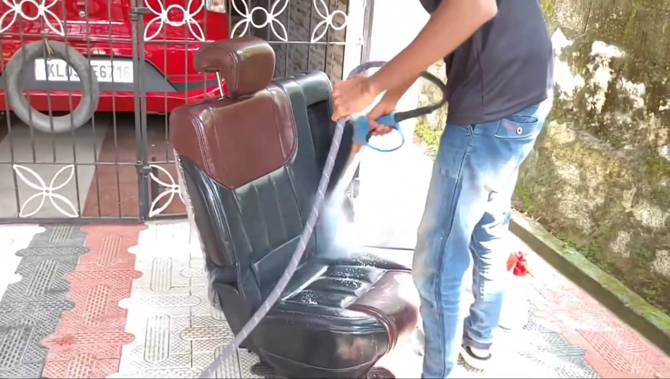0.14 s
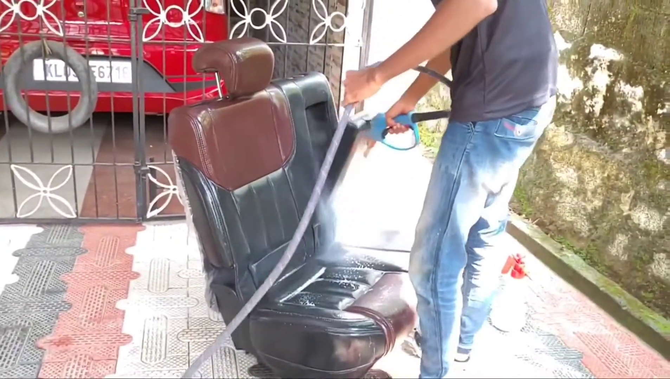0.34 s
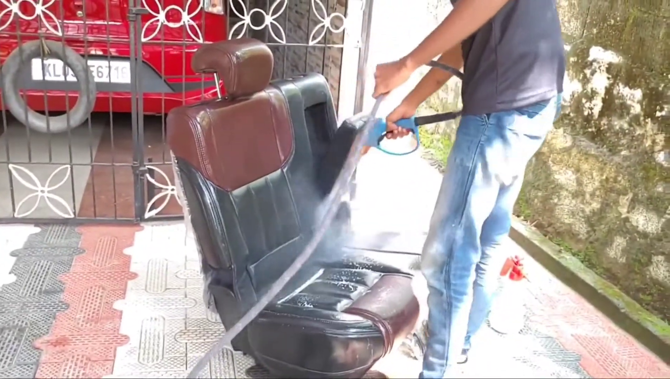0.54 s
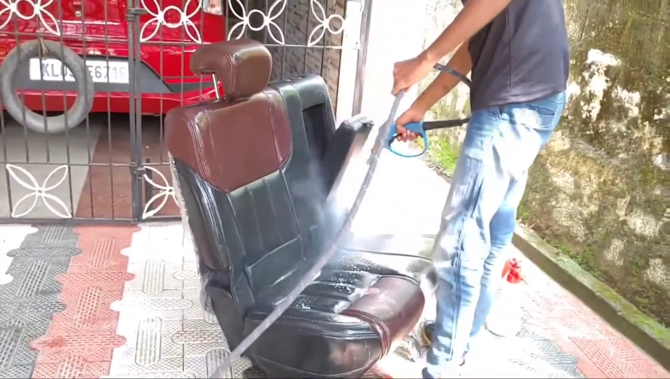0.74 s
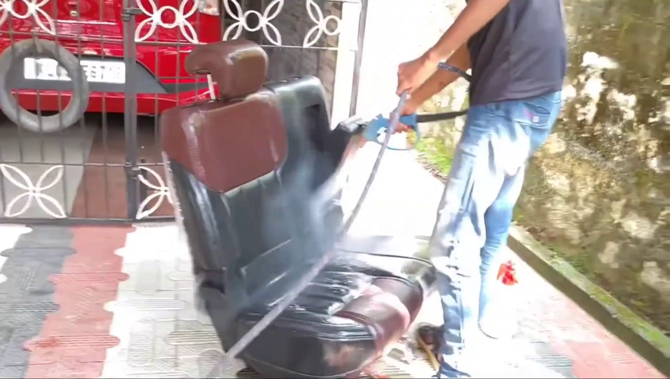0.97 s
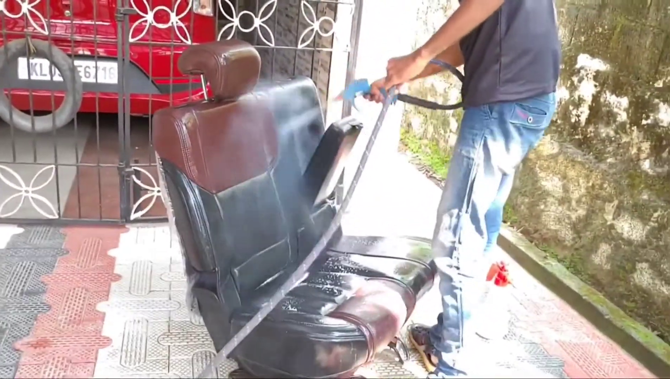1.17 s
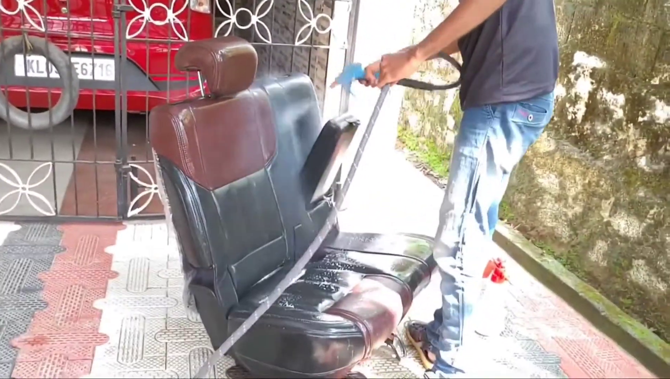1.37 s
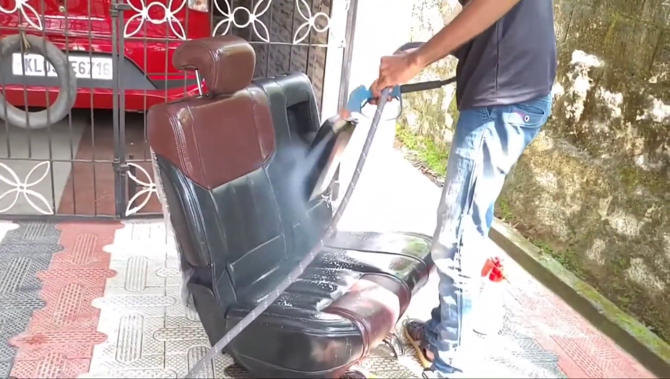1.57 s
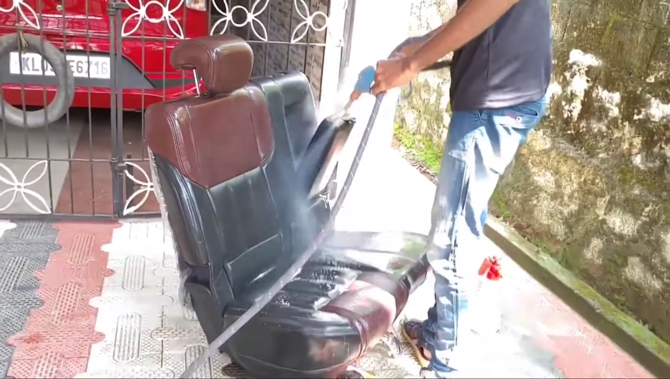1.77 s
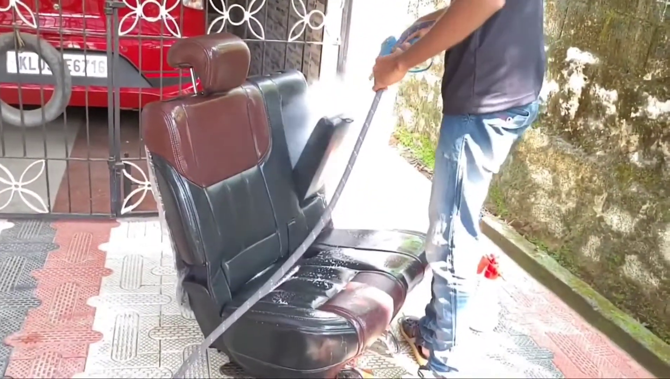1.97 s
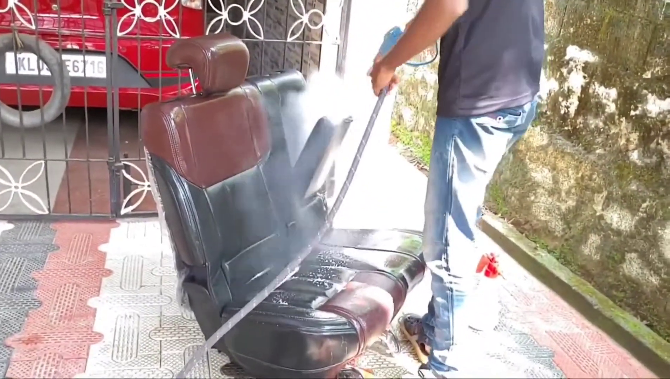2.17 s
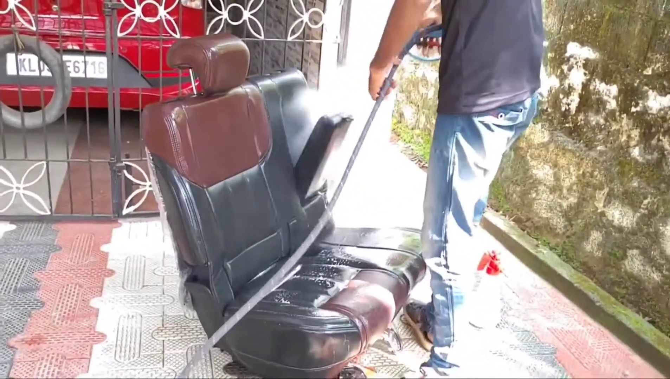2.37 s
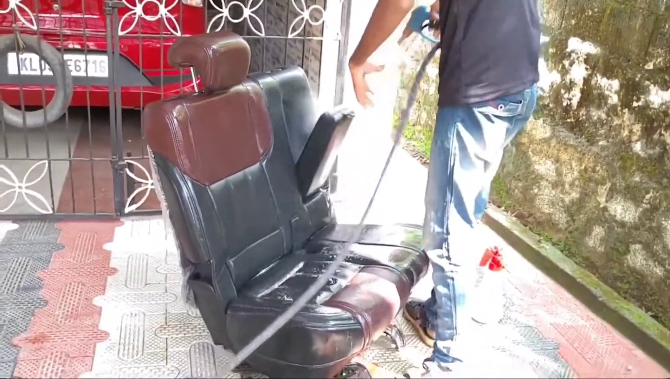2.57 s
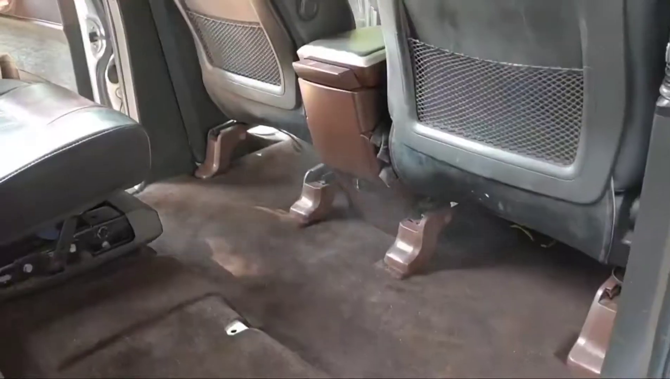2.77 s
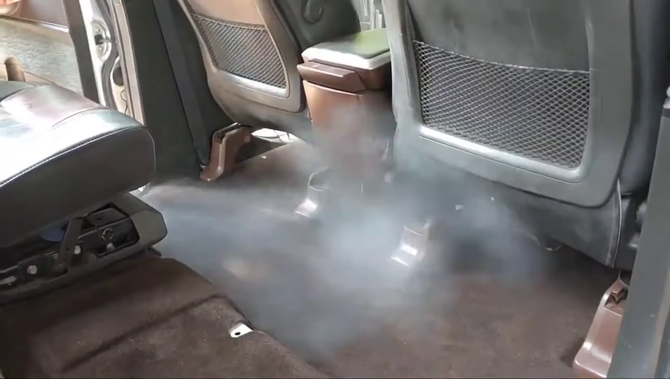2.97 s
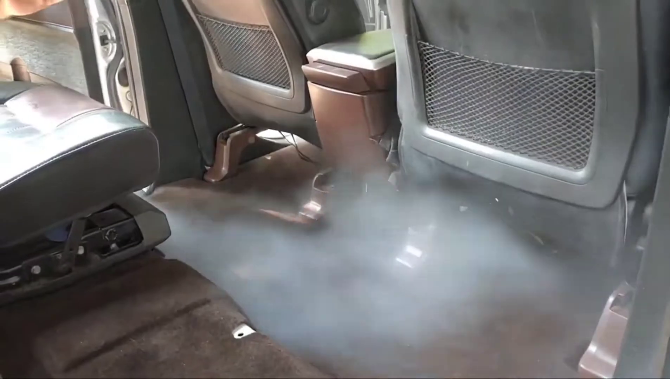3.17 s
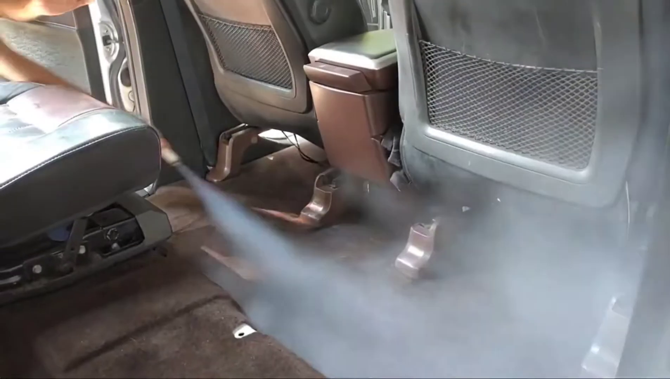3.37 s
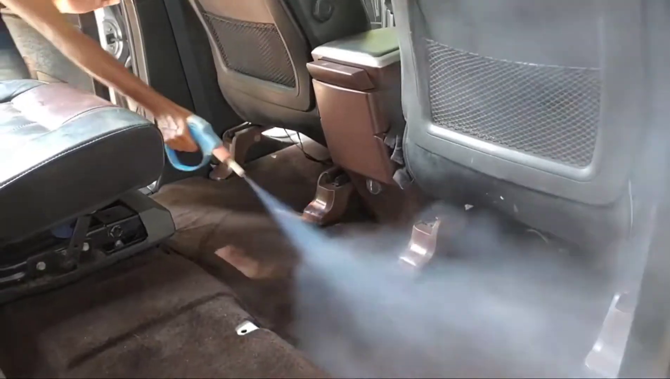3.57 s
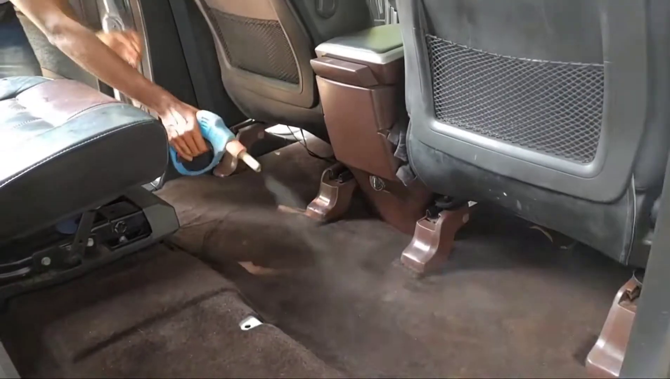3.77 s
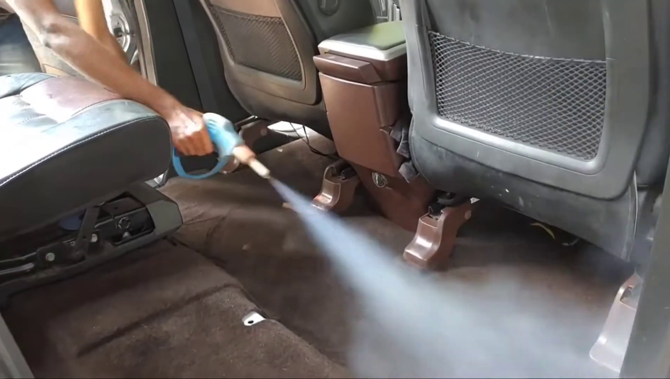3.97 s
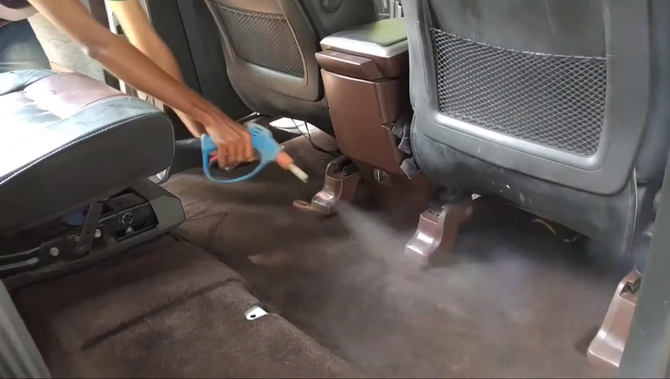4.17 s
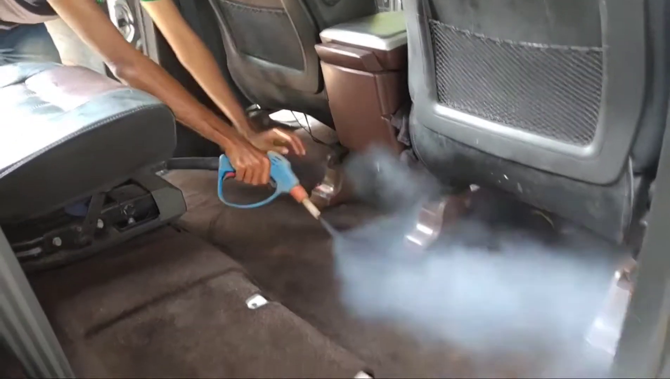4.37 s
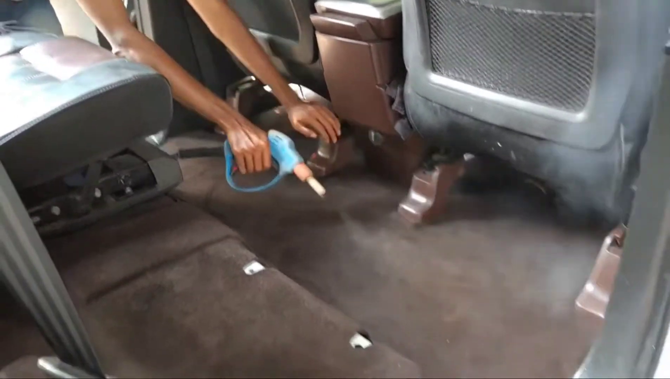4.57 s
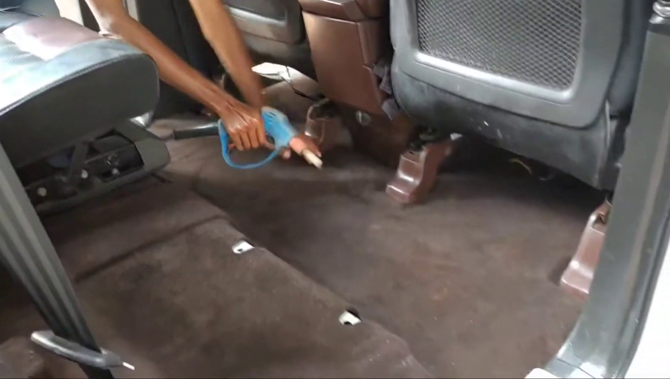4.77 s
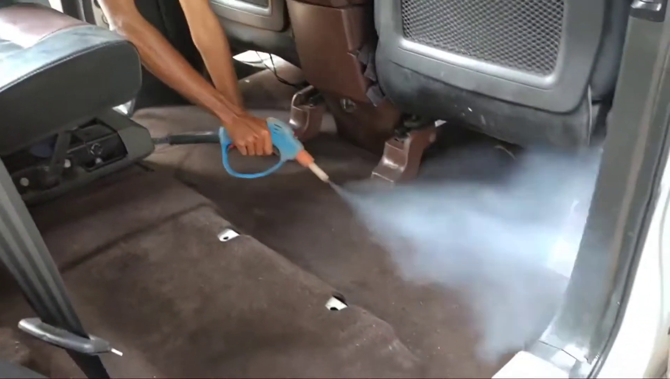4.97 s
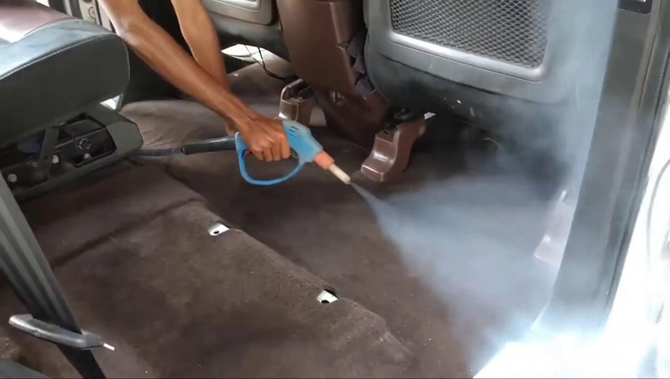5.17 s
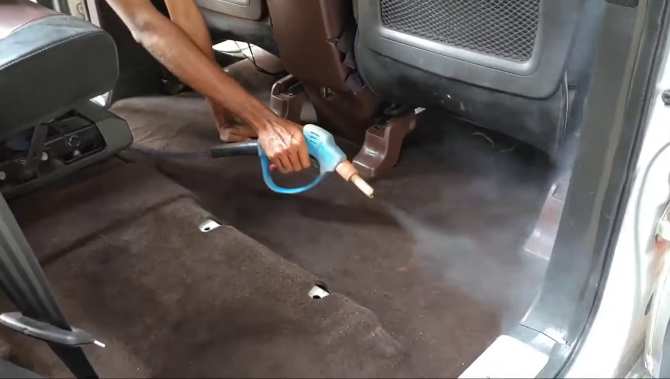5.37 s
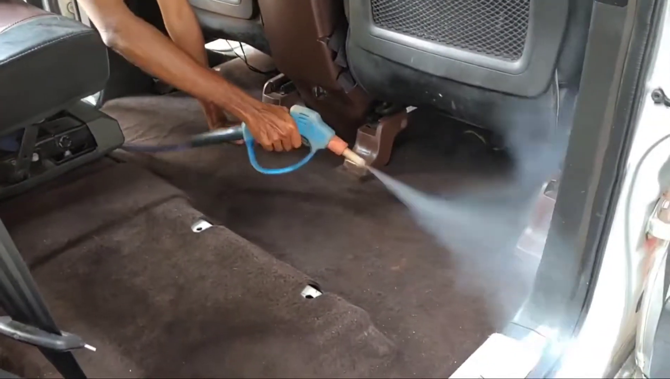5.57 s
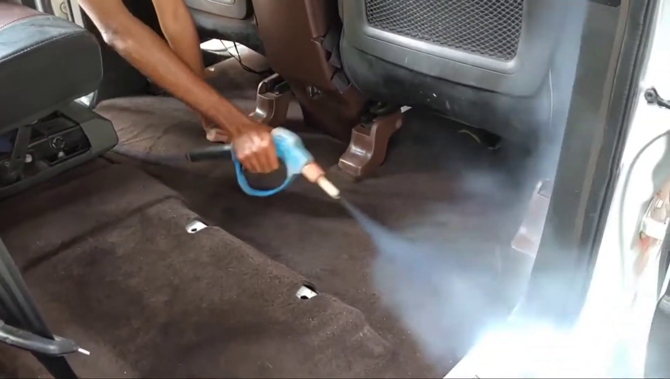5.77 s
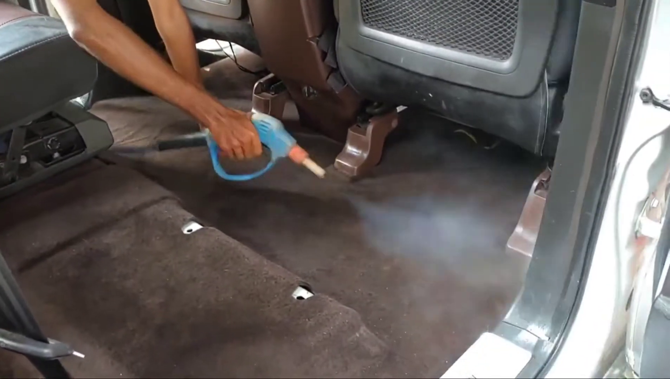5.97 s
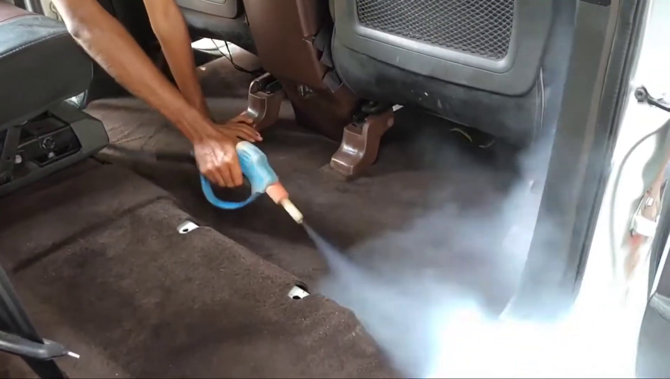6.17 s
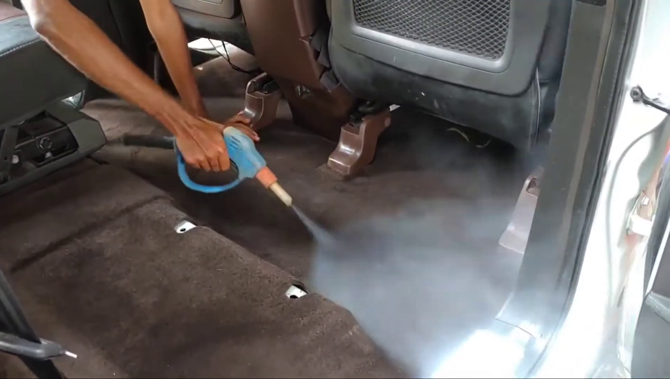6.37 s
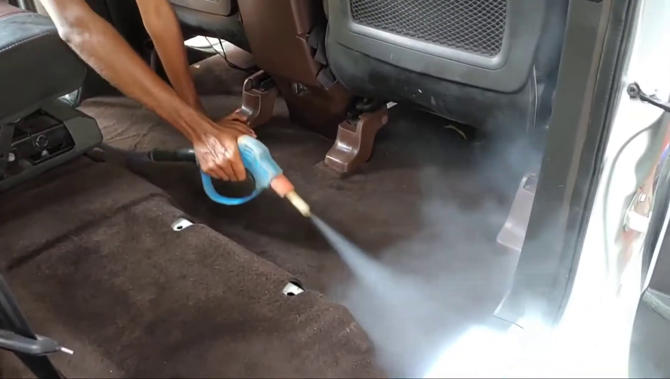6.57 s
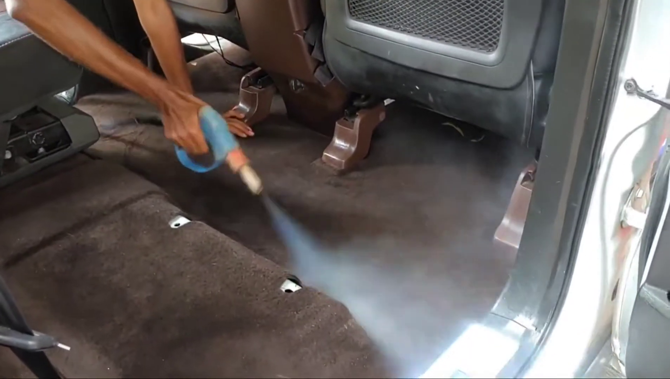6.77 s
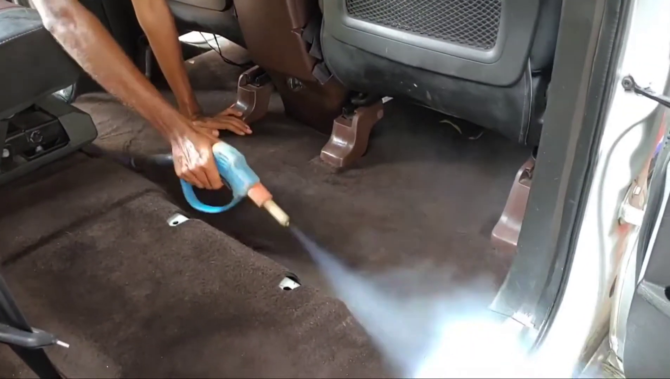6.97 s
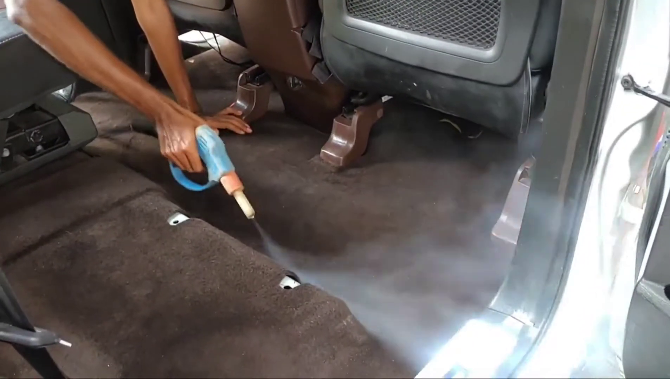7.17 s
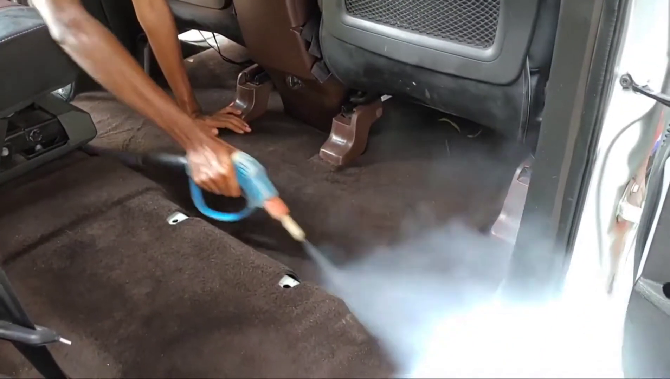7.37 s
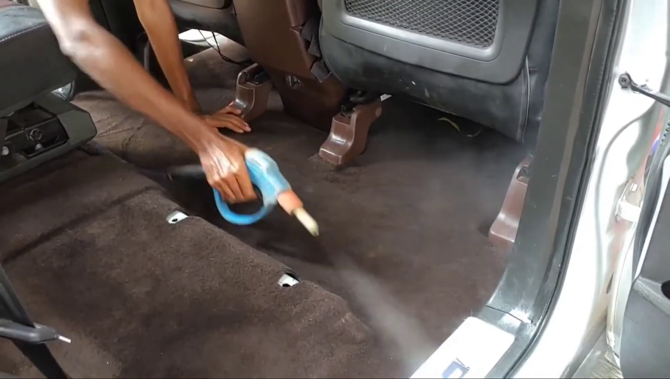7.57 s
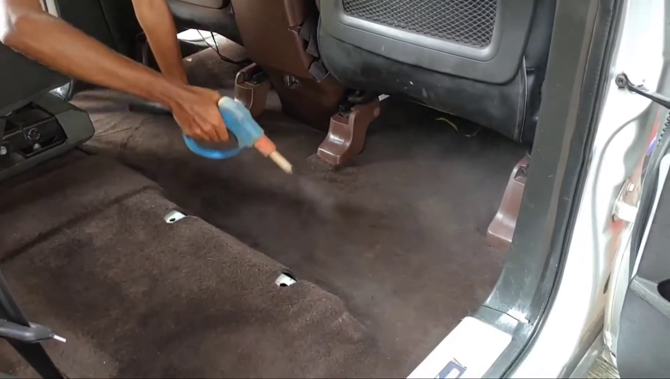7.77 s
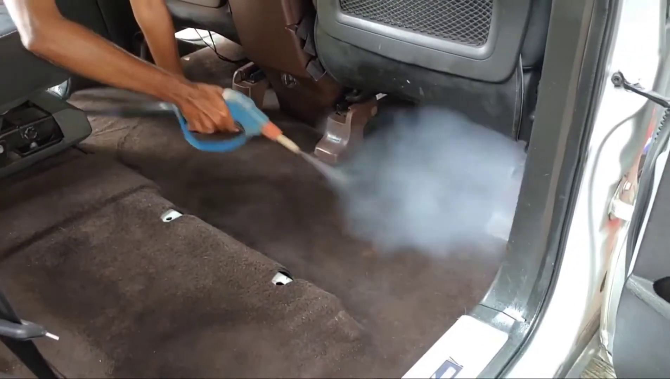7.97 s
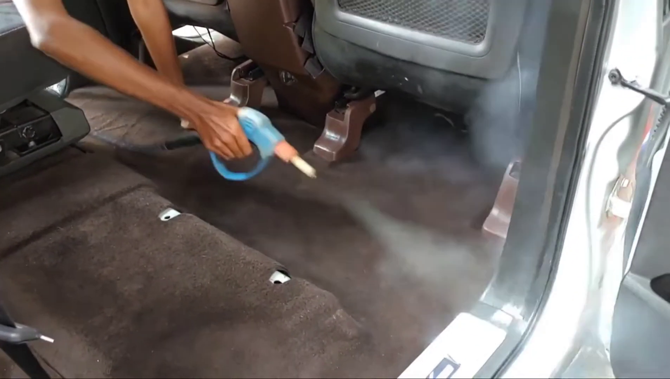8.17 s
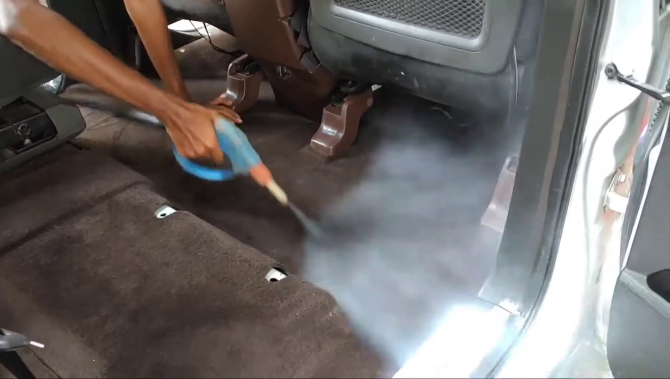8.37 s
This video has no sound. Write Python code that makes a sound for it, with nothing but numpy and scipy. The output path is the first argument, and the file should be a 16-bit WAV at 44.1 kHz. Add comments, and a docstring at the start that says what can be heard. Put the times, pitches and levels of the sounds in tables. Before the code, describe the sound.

Steady steam spray on a seat outdoors, followed by repeated sharp hissing bursts inside a car that buffet the microphone.

```python
"""A yard, then the inside of a car. A steam gun hisses steadily over a seat, splashing and drumming on
the leather, then fires short blasts at the car's carpet. Close up, the nozzle sings near 7.5 and
12.5 kHz, the steam cloud buffets the microphone with eddies, and the cabin rings briefly.
Gain control ducks the low outdoor drone under each blast and lets it swell back."""
import sys
import numpy as np
from scipy import signal
from scipy.fft import rfft, irfft, next_fast_len
from scipy.io import wavfile
from scipy.ndimage import uniform_filter1d, map_coordinates

SR = 44100
rng = np.random.default_rng(int(sys.argv[2]) if len(sys.argv) > 2 else 0)


def materialize(psi):
    """Save the field psi as 16-bit PCM at rate SR to the path in sys.argv[1].

    A 1-D psi becomes a single channel; in a 2-D psi each row is a channel.
    """
    bounded = np.clip(np.atleast_2d(psi).T, -1, 1)
    quanta = np.round(bounded * 32767).astype(np.int16)
    wavfile.write(sys.argv[1], SR, quanta)


N = 371763

# The outdoor bed. Each row: time in seconds, drone level in dB, air level in dB.
BED_LEVELS = [(0, -47, -44), (1.5, -46.5, -54.5), (2.85, -48, -54), (2.96, -34, -44.5), (3.3, -33, -43.5),
              (4.8, -40, -45), (6.2, -40, -48), (8.4, -35, -45.5)]
# A machine humming nearby. Each row: pitch in Hz, relative level in dB.
HUM_PARTIALS = [(148, -53), (208, -55), (725, -68)]
# Handling knocks. Each row: start in seconds, relative tone level in dB, pitch in Hz,
# seconds to fade by 60 dB, relative puff level in dB.
KNOCKS = [(0.44, -28, 80, 0.13, -56.5), (0.699, -31, 85.4, .15, -50), (1.167, -29, 94, 0.085, -35.5),
          (1.985, -36, 280, 0.17, -48)]
# The sweep over the seat. Each row: time in seconds, then relative splash, drumming and jet levels in dB.
SEAT_SWEEP = [(0.0, -33.5, -46, -35), (0.08, -34.5, -50, -36), (0.33, -35, -44, -33.5),
              (0.48, -34.5, -54, -36), (0.7, -32.5, -41, -33.5), (0.88, -35.5, -48.5, -35.5),
              (1.02, -34.5, -45, -35), (1.05, -34, -49, -35), (1.18, -32.5, -39, -35),
              (1.2, -33.5, -45, -32.5), (1.25, -34, -51.5, -34), (1.41, -37.5, -51, -35),
              (1.64, -34, -47.5, -34.5), (1.92, -36.5, -50, -35), (2.03, -32, -46, -37.5),
              (2.15, -36.5, -47.5, -37.5), (2.22, -35, -44, -35.5), (2.46, -33.5, -49.5, -35.5)]
# Trigger pulls in the car. Each row: open and close in seconds, relative jet, splash and nozzle ring
# levels in dB, cloud lag in seconds, relative big and small eddy levels in dB.
TRIGGER_PULLS = [(3.004, 3.147, -3.5, -17, -25, 0.03, -23, -19),
                 (3.221, 3.364, -5.5, -19.5, -15, 0.014, -9, -18),
                 (3.401, 3.567, -5, -23.5, -19.5, 0.0066, -9.5, -10),
                 (3.61, 3.8, -2.5, -19, -15.5, 0.003, -9, -11),
                 (4.058, 4.279, -5, -20.5, -17, 0.0038, -10, -11),
                 (4.376, 4.598, -6.5, -19, -19.5, 0.0046, -8, -17),
                 (5.061, 5.436, -5, -19.5, -16.5, 0.0046, -9, -10.7),
                 (5.707, 6.013, -5.5, -16.5, -14.5, 0.0034, -5.5, -12),
                 (6.153, 6.358, -6.5, -20.5, -16, 0.011, -10, -13),
                 (6.428, 6.621, -7, -22, -18, 0.006, -10, -15),
                 (6.697, 6.899, -5, -19.5, -16.5, 0.013, -7.5, -11.5),
                 (7.147, 7.323, -4.3, -19.5, -15, 0.006, -8, -11.3),
                 (7.465, 7.633, -4.5, -15.5, -14, 0.011, -6.5, -13),
                 (8.069, 8.274, -3, -15, -12.5, 0.0041, -4, -8.5),
                 (8.423, 8.500, -5.5, -16.5, -11.5, 0.004, 0, -13)]
# The jet trails on with the trigger half released. Each row: start and end in seconds, jet level in dB.
JET_TRAILS = [(5.448, 5.509, -18.5), (6.906, 6.958, -9.5)]
# Lumps of steam that hit the microphone squarely. Each row: time in seconds, peak in dB.
STEAM_THUMPS = [(3.060, 4), (3.245, 6), (4.448, 3)]
# The cloud drifts onto the microphone (a roar) or past it (a lull).
# Each row: start and end in seconds, change in buffeting in dB.
CLOUD_DRIFTS = [(4.07, 4.143, 4), (4.408, 4.428, -7), (4.476, 4.533, -13), (5.131, 5.184, -11),
                (5.74, 5.826, -7), (6.278, 6.299, -6), (6.455, 6.48, -10), (7.162, 7.21, 4)]

# Tone colours of the noise layers. Each row: frequency in Hz, relative level in dB.
DRONE_EQ = [(20, -40), (45, -12), (65, -3), (82, 0), (105, -3), (150, -15), (250, -24.5), (600, -58)]
AIR_EQ = [(100, 0), (270, 4), (500, -2.5), (1000, -4.5), (2300, -6), (3200, -10.5), (4500, -20.5),
          (8000, -22), (15000, -52)]
YARD_JET_EQ = [(200, -18), (1500, -20.5), (3000, -15), (7000, -7), (8500, -6.5), (9800, -2.5), (11200, -7),
               (12100, 2.5), (12700, 2), (14000, -2), (15500, -3)]
SEAT_SPLASH_EQ = [(200, -22), (1000, -18.5), (1700, -10.5), (2700, -1), (3900, -2.5), (5200, 2),
                  (6000, -2.5), (6900, -1), (8000, -10.5), (12000, -28.5)]
LEATHER_EQ = [(80, -5), (280, -1.5), (500, -1.5), (1000, -1.5), (1700, -2), (3000, -10), (6000, -41)]
CAR_JET_EQ = [(300, -26), (3000, -30), (6000, -18.5), (7000, -10), (8600, -11.5), (9400, -8),
              (10300, -10.5), (11300, -12.5), (11750, -2), (12200, 5.5), (12800, 2), (13500, 1.5),
              (15400, -6)]
NOZZLE_EQ = [(5000, -44), (6200, -15.5), (6800, -5), (7250, -3), (7580, -0.5), (7950, -5.5), (8400, -8),
             (10000, -26)]
CARPET_SPLASH_EQ = [(100, -7.5), (700, -5), (2000, 3), (4300, 0.5), (6000, 0), (9000, -3), (15000, -14)]
BIG_EDDY_EQ = [(12, -17), (28, -10), (48, -1.5), (90, -0.5), (170, -2.5), (330, -6.5), (600, -13),
               (1500, -24.5), (5000, -61)]
SMALL_EDDY_EQ = [(30, -37), (150, -8.5), (450, -1), (800, 0.5), (1400, -3), (2300, -6), (3300, -13),
                 (5000, -23), (10000, -54)]
# The cabin's reverb. Each row: frequency in Hz, seconds to fade by 60 dB.
CABIN_DECAY = [(100, 0.18), (1500, 0.14), (4000, 0.3), (8000, 0.34), (14000, 0.25)]
# Stereo widths. Each row: frequency in Hz, side level against the mid in dB.
BED_WIDTH = [(60, -50), (200, -37), (450, -19), (1500, -20), (3000, -33), (6000, -23)]
YARD_WIDE = [(60, 2), (300, 0.5), (1000, -1), (2200, -1.5), (3600, -10.5), (6000, -5.5), (9000, -2.5),
             (14000, -6.5)]
YARD_NARROW = [(60, -6), (300, -5), (1000, -8), (2200, -8.5), (3600, -45), (6000, -23), (9000, -12),
               (14000, -18.5)]
CAR_WIDE = [(60, -8), (400, -1), (2200, 0.5), (3600, -19), (6000, -10), (9000, -5), (14000, -15)]
CAR_NARROW = [(60, -54.5), (400, -30), (1500, -75), (4000, -90), (8000, -69.5), (11000, -40),
              (14000, -21.5)]

VALVE_RISE_S, VALVE_FALL_S = 0.0093, 0.034
CLOUD_RISE_S, CLOUD_FALL_S = 0.0093, 0.014


def amp(db):
    """Decibels to gain."""
    return 10 ** (np.asarray(db) / 20)


def unit(x):
    """x at rms 1."""
    return x / np.sqrt(np.mean(x ** 2) + 1e-20)


def clock():
    """Each sample's time in seconds."""
    return np.arange(N) / SR


def along(points, hz):
    """Read (Hz, value) points on a log frequency axis."""
    knots_hz, values = np.transpose(points)
    return np.interp(np.log(hz + 1), np.log(knots_hz + 1), values)


def curves(rows):
    """One automation curve for each column after the time."""
    times, *columns = np.transpose(rows)
    return [np.interp(clock(), times, column) for column in columns]


def wobble(rate):
    """A smooth random curve, rate knots a second."""
    return map_coordinates(rng.standard_normal(int(N * rate / SR) + 4), [clock() * rate])


def gate(opens, closes, rise, fall):
    """Full level from opens to closes; 20 dB down at rise seconds before and fall seconds after."""
    attack = amp(-20 * np.clip((opens - clock()) / rise, 0, 10) ** 1.3)
    return attack * amp(-20 * np.clip((clock() - closes) / fall, 0, 10))


def filtered(x, response):
    """x through an EQ whose gain is response(hz)."""
    size = next_fast_len(N + SR // 2, True)
    return irfft(rfft(x, size) * response(np.fft.rfftfreq(size, 1 / SR)), size)[..., :N]


def causal(x, eq, size=8192):
    """x through a minimum-phase EQ, which answers only after each push."""
    cepstrum = irfft(np.log(amp(along(eq, np.fft.rfftfreq(size, 1 / SR)))))
    impulse = irfft(np.exp(rfft(2 * cepstrum[:size // 2], size)))
    return signal.fftconvolve(x, impulse / np.abs(impulse).max())[:N]


def hiss(eq):
    """Coloured noise at rms 1."""
    return unit(filtered(rng.standard_normal(N), lambda hz: amp(along(eq, hz))))


def spray(eq, patchy_db):
    """Hiss whose fine colour shifts as the gun moves among reflecting surfaces."""
    bands = signal.stft(hiss(eq), nperseg=1024)[2]
    patches = uniform_filter1d(rng.standard_normal(bands.shape), size=3, axis=0)
    patches = unit(uniform_filter1d(patches, size=12, axis=1))
    return unit(signal.istft(bands * amp(patchy_db * patches), nperseg=1024)[1][:N])


def bounce(x, delay_s, share):
    """x plus its reflection off the ground: a comb filter that moves with the delay."""
    return unit(x + share * map_coordinates(x, [(clock() - delay_s) * SR]))


def spread(mid, width):
    """Stereo with diffuse sound from the sides."""
    scatter = rng.standard_normal(SR // 60)
    side = signal.fftconvolve(mid, scatter / np.linalg.norm(scatter))[:N]
    side = filtered(side, lambda hz: amp(along(width, hz)))
    return np.array([mid + side, mid - side])


def narrowing(x, wide, narrow, at_s, over_s):
    """Crossfade from a wide stereo image to a narrow one."""
    early = gate(0, at_s, rise=0.01, fall=over_s)
    return spread(early * x, wide) + spread((1 - early) * x, narrow)


def outdoor_bed():
    """A low throbbing drone, the murmur of open air and, by the car, a machine's faint unsteady hum."""
    drone_db, air_db = curves(BED_LEVELS)
    hum = sum(amp(db + 4.5 + 3.2 * wobble(6.7)) * np.sin(2 * np.pi * hz * clock() + wobble(20))
              for hz, db in HUM_PARTIALS)
    hum *= gate(3.0, 9, rise=0.16, fall=0.02)
    return amp(drone_db) * hiss(DRONE_EQ) + amp(air_db) * hiss(AIR_EQ) + hum


def handling_knocks():
    """Hose and seat knock softly as they are handled: a damped low tone with a puff of noise."""
    knocks = np.zeros(N)
    for start, tone_db, hz, t60, puff_db in KNOCKS:
        age = np.maximum(clock() - start, 0)
        envelope = (1 - np.exp(-age / 0.0035)) * amp(-60 * age / t60)
        tone = amp(tone_db + 0.5) * np.sin(2 * np.pi * hz * age)
        knocks += envelope * (tone + amp(puff_db + 8) * hiss(AIR_EQ))
    return knocks


def cabin_reverb(x):
    """The short, diffuse ring of the car's interior."""
    hz, t, bands = signal.stft(rng.standard_normal(SR // 2), SR, nperseg=256)
    decay = amp(-60 * t / along(CABIN_DECAY, hz)[:, None])
    tail = signal.istft(bands * decay, SR, nperseg=256)[1]
    return signal.fftconvolve(x, tail / np.linalg.norm(tail))[:N]


def valve_leak():
    """The shut valve seeps a little, and once whistles faintly."""
    seep = amp(-61.5) * hiss(NOZZLE_EQ) + amp(-63.5) * hiss(CAR_JET_EQ)
    pitch_hz = 3530 + 40 * wobble(160)
    whistle = amp(-49 + 3 * wobble(30)) * np.sin(2 * np.pi * np.cumsum(pitch_hz) / SR)
    return seep * gate(2.92, 9, rise=0.097, fall=0.02) + whistle * gate(3.84, 4.02, rise=0.03, fall=0.1)


def seat_spray(shuts_s=2.466):
    """A steady jet some steps away sweeps the seat: it splashes, and drums on the leather to the left."""
    splash_db, drum_db, jet_db = curves(SEAT_SWEEP)
    flow = gate(0, shuts_s, rise=0.01, fall=0.11)
    jet = amp(jet_db + 4) * spray(YARD_JET_EQ, patchy_db=2.8) * flow
    splash = spray(SEAT_SPLASH_EQ, patchy_db=2.5)
    splash = bounce(splash, delay_s=0.0007 + 0.00017 * wobble(3.02), share=0.077)
    splash *= amp(splash_db + 1.3) * gate(0, shuts_s, rise=0.01, fall=0.14)
    drum = amp(drum_db + 0.8) * hiss(LEATHER_EQ) * flow
    steam, drum = [narrowing(x, YARD_WIDE, YARD_NARROW, at_s=1.18, over_s=0.06)
                   for x in (jet + splash, drum)]
    return steam * amp([[-0.3], [0.3]]) + drum * amp([[2.2], [-3]])


def nozzle_spit(start_s=2.991):
    """The first pull clears condensed water from the nozzle with a hollow spit that falls in pitch."""
    water = hiss([(1500, -13), (2600, -8), (3300, 0), (4100, 5.5), (6000, -1), (10000, 2.5), (15000, -15)])
    age = np.maximum(clock() - start_s, 0)
    travel_s = 0.0005 * (1 - np.exp(-age / 0.06))  # the echo lags more as the water flies off
    water = bounce(water, delay_s=0.00066 + travel_s, share=0.8)
    return amp(-22) * water * gate(start_s, 3.03, rise=0.0056, fall=0.13)


def eddies(eq, per_s, turbulence):
    """Each eddy hits the microphone as a sharp push with a slow rebound; fine turbulence lies between."""
    pushes = (rng.random(N) < per_s / SR) * rng.uniform(0.53, 1, N)
    pressure = unit(pushes - pushes.mean()) + turbulence * rng.standard_normal(N)
    return unit(causal(pressure, eq))


def cloud_buffeting():
    """While the valve is open, the swirling cloud blows big and small eddies onto the microphone."""
    big, small, lumps = np.zeros((3, N))
    for opens, closes, *_, lag, big_db, small_db in TRIGGER_PULLS:
        cloud = gate(opens + lag, closes, CLOUD_RISE_S, CLOUD_FALL_S)
        big += cloud * amp(big_db)
        small += cloud * amp(small_db)
    for start, end, jet_db in JET_TRAILS:  # a trailing jet barely buffets
        small += gate(start, end, CLOUD_RISE_S, CLOUD_FALL_S) * amp(jet_db - 20.5)
    for start, peak_db in STEAM_THUMPS:
        lumps[round(start * SR)] = amp(peak_db)
    big *= amp(1.1 * wobble(40)) * eddies(BIG_EDDY_EQ, per_s=160, turbulence=0.52)
    small *= amp(1.35 * wobble(90)) * eddies(SMALL_EDDY_EQ, per_s=900, turbulence=0.45)
    drift_db = sum(db * gate(start, end, rise=0.02, fall=0.02) for start, end, db in CLOUD_DRIFTS)
    swirl_db = 2 * wobble(25)
    return amp(drift_db + swirl_db) * (big + small) + causal(lumps, BIG_EDDY_EQ)


def steam_blasts(wet_db=2.5, drying_s=0.11):
    """Each trigger pull lets out a jet, rings the nozzle and splashes the carpet, wettest at first."""
    jet, splash, ring = np.zeros((3, N))
    for opens, closes, jet_db, splash_db, ring_db, *_ in TRIGGER_PULLS:
        valve = gate(opens, closes, VALVE_RISE_S, VALVE_FALL_S)
        wetness = np.exp(-np.maximum(clock() - opens, 0) / drying_s)
        jet += valve * amp(jet_db)
        splash += valve * amp(splash_db + wet_db * wetness)
        ring += valve * amp(ring_db)
    for start, end, jet_db in JET_TRAILS:
        trail = amp(jet_db) * gate(start, end, VALVE_RISE_S, VALVE_FALL_S)
        jet += trail
        splash += amp(-18) * trail
        ring += amp(-10.5) * trail
    steam = jet * spray(CAR_JET_EQ, patchy_db=2.1)
    steam += ring * spray(NOZZLE_EQ, patchy_db=4)
    steam += splash * spray(CARPET_SPLASH_EQ, patchy_db=3.4)
    steam *= amp(0.36 * wobble(350) + 0.66 * wobble(20))  # wet steam sputters
    steam *= np.interp(clock(), [2.995, 3.06], [0.5, 1])  # the first jet builds as the nozzle clears
    return steam + amp(-12.5) * cabin_reverb(steam)


def scene():
    """The yard starts wide and narrows; after its first puff the close jet in the car is nearly mono."""
    car = steam_blasts() + cloud_buffeting() + nozzle_spit() + valve_leak()
    car = narrowing(car, CAR_WIDE, CAR_NARROW, at_s=3, over_s=0.11)
    return seat_spray() + handling_knocks() + car + spread(outdoor_bed(), BED_WIDTH)


def gain_control(x, limit_db, release_db_per_s):
    """Duck the mix at once when its level passes the limit, then let it swell back."""
    power = np.abs(uniform_filter1d(np.mean(x ** 2, axis=0), size=700))
    excess_db = np.maximum(10 * np.log10(power + 1e-12) - limit_db, 0)
    recovery_db = release_db_per_s * clock()
    cut_db = np.maximum.accumulate(excess_db + recovery_db) - recovery_db
    return x * amp(-uniform_filter1d(cut_db, size=200))


def record(dry):
    """The master chain: gain control, soft clipping and a steep high cut."""
    ducked = gain_control(dry, limit_db=-11.5, release_db_per_s=16)
    rounded = ducked / (1 + ducked ** 6) ** (1 / 6)
    high_cut_hz = 15450
    return filtered(rounded, lambda hz: amp(-np.clip((hz - high_cut_hz) / 8, 0, 90)))


dry = scene()
out = record(dry)
materialize(out)
```